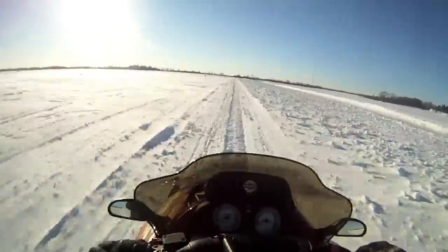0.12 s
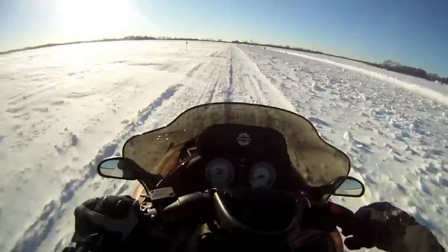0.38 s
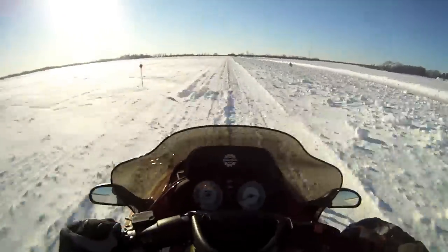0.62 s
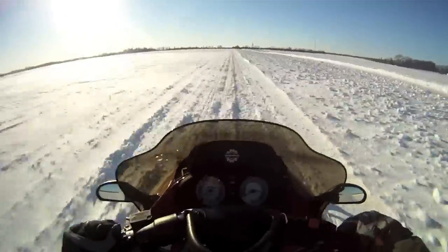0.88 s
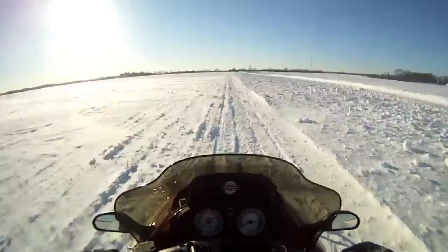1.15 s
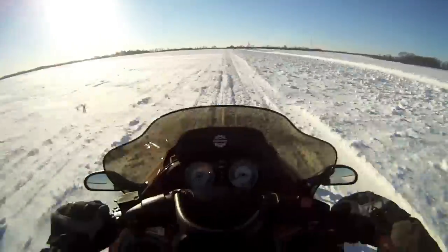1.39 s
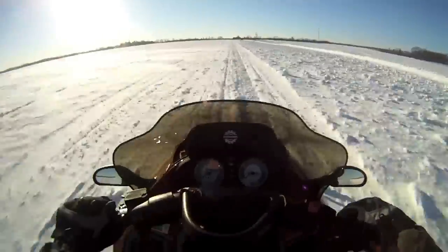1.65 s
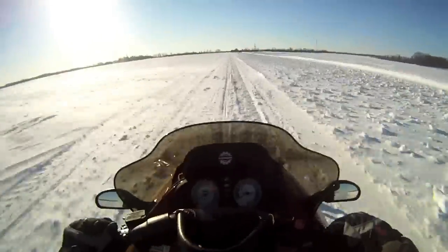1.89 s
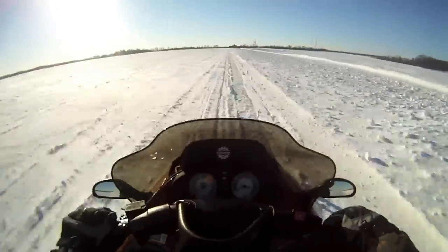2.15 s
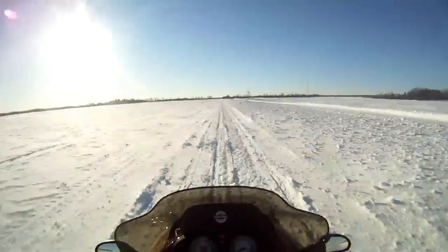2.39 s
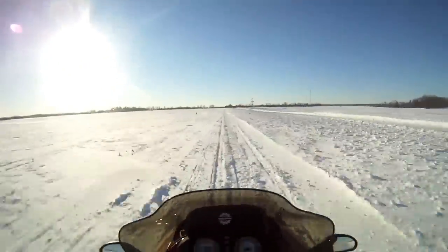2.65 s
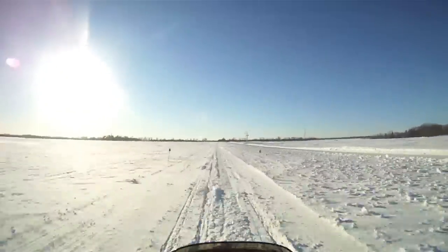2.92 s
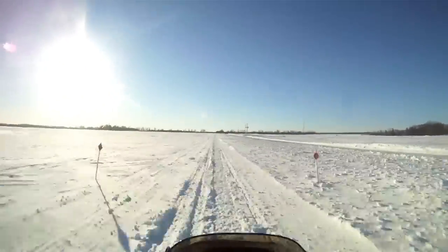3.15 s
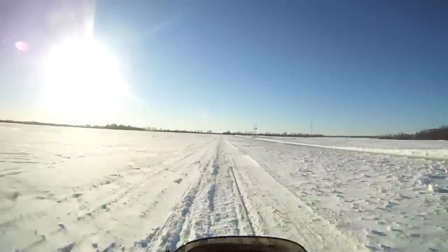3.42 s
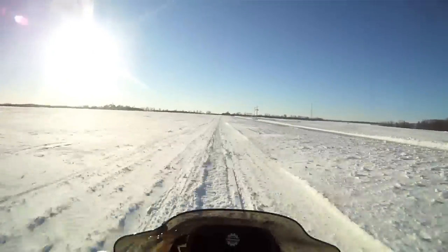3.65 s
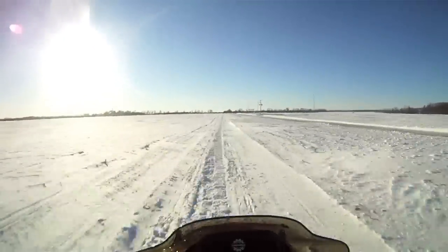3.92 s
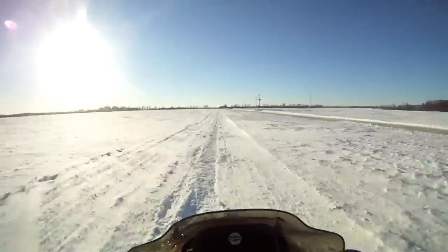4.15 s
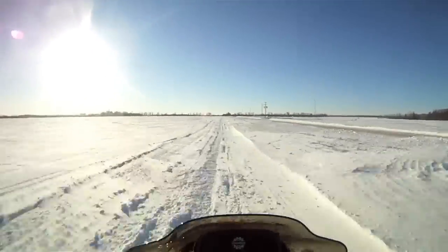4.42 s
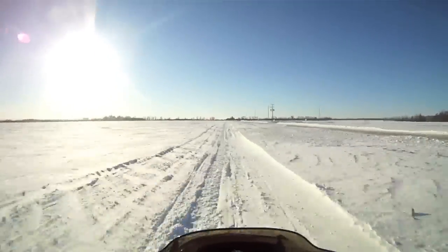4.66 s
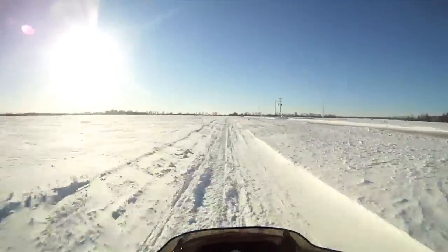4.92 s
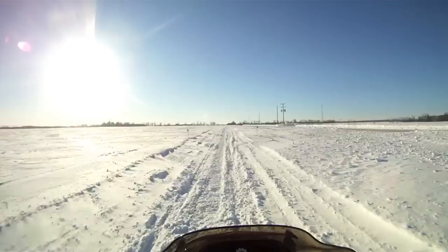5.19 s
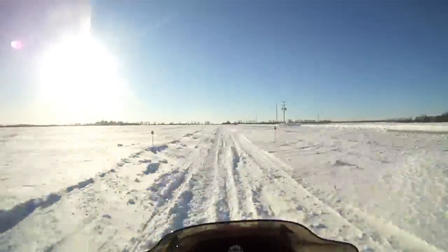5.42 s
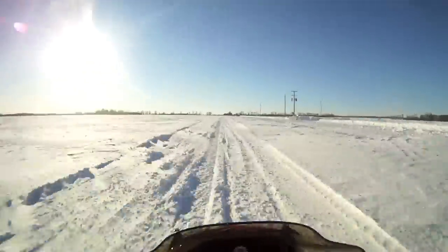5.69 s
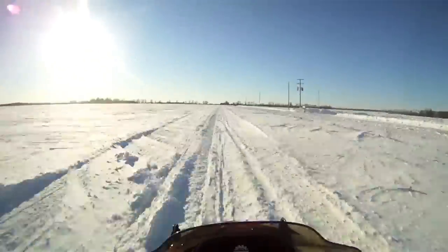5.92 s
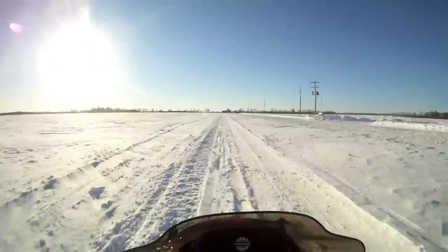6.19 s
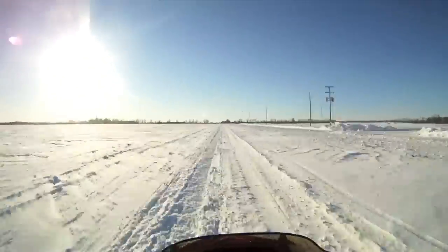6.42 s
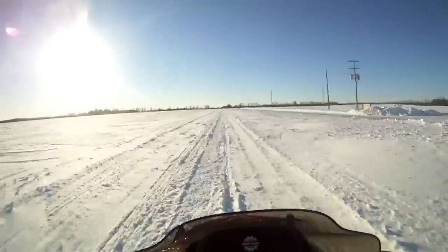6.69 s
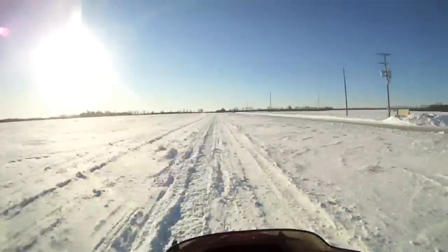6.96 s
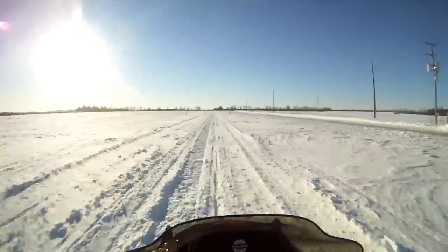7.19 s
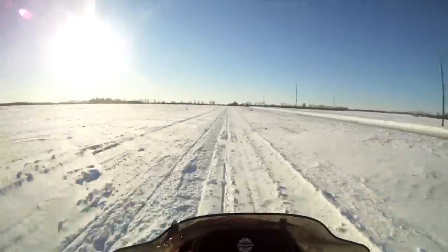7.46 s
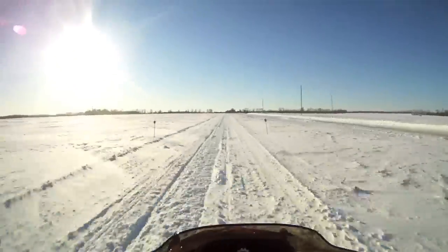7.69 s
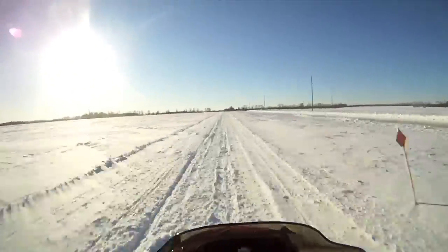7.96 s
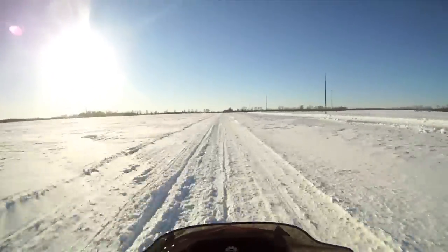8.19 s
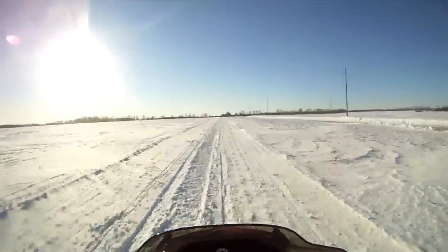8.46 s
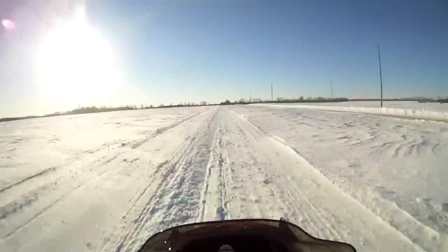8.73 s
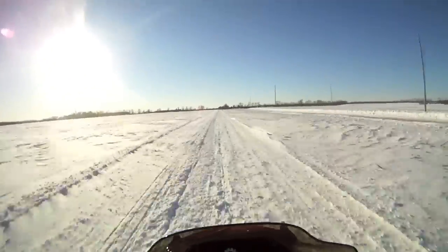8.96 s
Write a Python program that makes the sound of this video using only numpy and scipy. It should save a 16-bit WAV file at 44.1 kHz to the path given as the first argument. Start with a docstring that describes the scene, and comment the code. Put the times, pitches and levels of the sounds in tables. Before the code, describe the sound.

Headwind fills a sealed housing on a snowmobile rider's helmet over an open snowfield; no separate engine is audible. From 0 s a muffled hiss rises quickly, hollow and nasal around one to four kilohertz, over low buffeting near 100 to 150 hertz and faint thin shell ringing. A small high knock comes at 0.2 s, a stronger one at 1.3 s. Deep open wind is fullest from about 0.4 to 2.2 s, with scattered hard thumps. A brief lull near 2.5 s leads into a bright rush of hiss peaking at 2.8 s. From 3 s the deep wind recedes and tight gusts batter irregularly, several each second, especially strong near 5.7, 6.0, 6.4 and 7.7 s. The hiss eases around 7.2 s, then swells again near 8.2 s. Hard gusts momentarily duck everything, with gritty mirrored treble above. The roar continues to the end at 9.1 s.

```python
"""A snowy field, crossed flat out by snowmobile, heard from inside a sealed housing on the rider's helmet.
Only the headwind is heard: shaped noise makes the low buffeting, the hiss coloured by air cavities
and the thin shell tones; short decaying swings make the hard gusts and two knocks.
Gain control ducks the sound after the hardest gusts and lets it back slowly;
a slow sample-and-hold converter mirrors the sound into the treble."""
import sys
import numpy as np
from scipy import signal
from scipy.fft import rfft, irfft, next_fast_len
from scipy.io import wavfile
from scipy.ndimage import uniform_filter1d

SR = 44100
rng = np.random.default_rng(int(sys.argv[2]) if len(sys.argv) > 2 else 0)


def natural_amplitude(level_db):
    """Convert a level in decibels to a linear amplitude factor, elementwise."""
    exponent = np.asarray(level_db, float) / 20
    return 10 ** exponent


def unload_wav(signal):
    """Save mono or channel-first audio to the path in sys.argv[1] as 16-bit WAV at rate SR, clipped to [-1, 1]."""
    wavfile.write(
        sys.argv[1],
        SR,
        np.round(np.clip(np.atleast_2d(signal).T, -1, 1) * 32767).astype(np.int16),
    )


N = 400868


def evened(x):
    """Normalisation: scales to an rms of 1."""
    return x / np.sqrt(np.mean(x ** 2) + 1e-20)


def curve(rows):
    """Linear interpolation in time: one value a sample for each column after the first."""
    s, *columns = np.transpose(rows)
    return [np.interp(np.arange(N) / SR, s, c) for c in columns]


def envelope(x):
    """Analytic signal: its magnitude is the momentary amplitude."""
    return abs(signal.hilbert(x, next_fast_len(N))[:N])


def spectrum(points, hz):
    """Spectral envelope: gain interpolated in decibels over log frequency."""
    f, db = np.transpose(points)
    return natural_amplitude(np.interp(np.log(hz + 1), np.log(f + 1), db, right=-120))


def resonances(modes, hz, steep):
    """Modal superposition: the powers of the resonance curves add; steep is the exponent of their skirts."""
    f, width, db = np.transpose(modes)[:, :, None]
    detuning = 2 * (hz - f) / width
    power = natural_amplitude(2 * db) / (1 + detuning ** 2) ** steep
    return np.sqrt(power.sum(0))


def wander(hz):
    """Low-passed noise: slow chance of rms 1, varying up to about hz."""
    lowpass = signal.butter(2, hz, fs=SR, output="sos")
    return evened(signal.sosfilt(lowpass, rng.standard_normal(N)))


def coloured(shape, patchy_db):
    """Short-time synthesis: shaped noise of rms 1 whose spectrum has drifting patches."""
    frames, hz = N // 1024 + 5, np.fft.rfftfreq(4096, 1 / SR)
    real, imaginary, patches = rng.standard_normal((frames, 2049, 3)).T
    patches = uniform_filter1d(patches, 40, 0)  # smooth over frequency
    patches = evened(uniform_filter1d(patches, 3, 1))  # smooth over time
    bins = (real + 1j * imaginary) * shape(hz)[:, None] * natural_amplitude(patchy_db * patches)
    noise = signal.istft(bins, nperseg=4096, noverlap=3072)[1]
    return evened(noise[2048:N + 2048])


# the head rises into the airstream, turns through it, then tucks down; levels before gain control:
# time_s, hiss_db, brightness_db (upper cavities), buffeting_db, open_wind_db (against the buffeting)
AIRFLOW = [(0, -23, -9.5, -17, -6), (.15, -16.5, -7, -19, -4), (.4, -17.5, -9, -13.5, 5.5),
           (1.2, -15.5, -7.5, -14.5, 0.5), (1.4, -15.5, -9, -13, 1.5), (2.2, -16, -8, -12.5, 3),
           (2.32, -13, -7.5, -17, -5), (2.8, -5.5, -6, -11, 1), (2.9, -10, -7.5, -7, -15),
           (3.4, -15, -6.5, -13, -27), (4.3, -13, -7.5, -13, -17), (5.2, -15, -6, -13, -13),
           (6.2, -12.5, -7.5, -10.5, -16), (7.2, -19, -7, -16, -16), (7.45, -13, -7, -15.5, -8),
           (8.2, -11, -6.5, -10, -18), (9.09, -13, -6.5, -13, -9)]
# air cavities in front of the microphone, relative levels: pitch_hz, nominal_width_hz, level_db
LOWER_CAVITIES = [(852, 92, -10.5), (1272, 273, -5), (1666, 470, -5), (1980, 165, -7), (2202, 510, -3),
                  (2860, 380, -21)]
UPPER_CAVITIES = [(3372, 320, -7), (3760, 495, -2.5), (4760, 350, -15), (5360, 1370, -20)]


def hiss():
    """Cavity resonance: turbulence at the port, fluttering as eddies pass, rings the cavities."""
    level_db, bright_db = curve(AIRFLOW)[:2]
    lower = coloured(lambda hz: resonances(LOWER_CAVITIES, hz, steep=1.62), patchy_db=0.22)
    upper = coloured(lambda hz: resonances(UPPER_CAVITIES, hz, steep=2.05), patchy_db=0.03)
    flutter_db = 1.05 * wander(hz=141) + 0.52 * wander(hz=23.1)
    upper_flutter_db = 0.8 * flutter_db + 0.3 * wander(hz=200) + 0.49 * wander(hz=12)
    lower = lower * natural_amplitude(flutter_db)
    upper = upper * natural_amplitude(bright_db + upper_flutter_db)
    return natural_amplitude(level_db) * (lower + upper)


# thin shell ringing in the wind, relative levels: pitch_hz, nominal_width_hz, level_db
SHELL = [(395, 8, -2), (418, 8, 0), (529, 8, -1), (626, 14, 0), (750, 28, 4), (1990, 20, 9)]


def shell():
    """Structural modes: noise rings the narrow modes of the housing, shaken harder by open wind."""
    modes = resonances(SHELL, np.fft.rfftfreq(N, 1 / SR), steep=1.8)
    ringing = evened(irfft(rfft(rng.standard_normal(N)) * modes, N))
    level_db, _, _, open_db = curve(AIRFLOW)
    return ringing * natural_amplitude(level_db - 13 + 0.16 * open_db)  # 13 dB is taken off the hiss level


# spectral densities of the push on the housing and of the raw wind, relative: pitch_hz, level_db
RUMBLE = [(30, -24), (59, -55), (85, -5.5), (105, 0.5), (128, 0.5), (169, -4), (205, -11), (260, -18.5),
          (370, -31.5), (560, -49), (900, -44)]
DEEP_WIND = [(15, -12), (30, -16), (58, -7.5), (92, 0), (150, -8.5), (240, -15.5), (400, -24.5),
             (700, -26.5), (1000, -26), (1400, -48)]
# brief changes of the push, nearly all lulls: centre_s, half_length_s (to 1/e of the change), change_db
LULLS = [(.05, .03, -10), (0.903, 0.019, -3), (1.04, .02, -8), (2.472, 0.028, -12), (3.065, 0.017, -14),
         (3.56, .015, -12), (4.126, 0.014, -10), (4.29, 0.012, -6), (4.938, 0.015, -12), (5.315, 0.035, -5),
         (5.557, .04, -13), (5.825, 0.15, -5.5), (6.116, .04, -5), (6.76, .03, -4), (7.344, 0.024, -6),
         (7.52, 0.02, -10), (7.626, 0.012, -10), (7.776, 0.029, 1), (7.99, 0.0075, -5), (8.403, 0.026, -12),
         (8.666, 0.044, -5.5)]


def buffet():
    """Turbulent pressure: large eddies push; raw, deeper wind fades once the rider tucks behind the windshield."""
    push = coloured(lambda hz: spectrum(RUMBLE, hz), patchy_db=0.3)
    swing = uniform_filter1d(envelope(push), 300)
    push = evened(push / (swing + .2) ** .55)  # between hard gusts the push is even
    raw = coloured(lambda hz: spectrum(DEEP_WIND, hz), patchy_db=0.5)
    level_db, open_db = curve(AIRFLOW)[2:]
    t = np.arange(N) / SR
    lull_db = sum(db * np.exp(-((t - s) / half) ** 2) for s, half, db in LULLS)
    share = natural_amplitude(open_db)
    mix = natural_amplitude(lull_db) * push + share * raw
    return natural_amplitude(level_db) * mix / np.hypot(1, share)  # the sharing leaves the power as it was


def bumps(rows, turns, ring, ring_db):
    """Damped oscillation: a swing of a few cycles around its moment, then a softer ring; spans in cycles."""
    out = np.zeros(N + SR)
    for (s, db, hz), phase in zip(rows, rng.random((len(rows), 1))):
        cycles = np.arange(-3 * turns, 3 * turns + 4 * ring, hz / SR)
        at = round((s - 3 * turns / hz) * SR)
        swing = np.exp(-(cycles / turns) ** 2)
        tail = (cycles > 0) * natural_amplitude(ring_db) * np.exp(-cycles / ring)
        tone = np.cos(2 * np.pi * (cycles + phase))
        out[at:at + len(cycles)] += natural_amplitude(db) * np.maximum(swing, tail) * tone
    return out[:N]


# knocks on the shell, envelope peak before gain control: centre_s, level_db, pitch_hz
KNOCKS = [(0.205, -4.5, 2100), (1.331, 1, 1604)]


def knocks():
    """Impact response: each blow sets off a short, high oscillation."""
    return bumps(KNOCKS, turns=3.5, ring=2.2, ring_db=-6)


# hard gusts, envelope peak before gain control: centre_s, level_db, pitch_hz
GUSTS = [(0.35, -2.5, 126), (0.501, -5.0, 125), (0.658, -1.8, 125), (0.778, -4.5, 138), (0.851, -1, 133.0),
         (0.952, -1.3, 124), (1.076, -4, 130), (1.139, -4.5, 123.0), (1.54, -5, 121.0), (1.793, -0.5, 123),
         (1.926, -4.5, 148), (1.981, 0, 128), (2.097, -0.5, 130), (3.026, 0, 137), (3.098, 0.8, 126),
         (3.197, 0.5, 125), (3.359, -3, 135), (3.533, -0.5, 136.0), (3.59, -0.2, 135.0), (3.753, -2, 136.0),
         (3.818, -3.5, 126.0), (3.878, -2.5, 149), (3.917, -1, 133), (4.018, -1, 143.0), (4.104, -1.1, 125),
         (4.259, -2.5, 152), (4.369, -0.7, 130), (4.507, -4.5, 142.0), (4.609, -3.5, 124), (4.666, -3, 138),
         (4.717, -4.5, 154), (4.871, -1.5, 131), (5.021, -1, 128.0), (5.138, -1.7, 141.0), (5.237, 0, 127),
         (5.394, -5, 135.0), (5.448, -1, 131), (5.683, 2.8, 134), (5.729, 2.5, 130.0), (5.996, 2.5, 128),
         (6.397, 2, 138), (6.529, -2.9, 127), (6.666, -2.5, 136.0), (6.705, 0, 123), (6.945, -3.5, 131),
         (7.114, -5, 142), (7.16, -3.5, 138), (7.205, -2.5, 137), (7.469, -2.5, 126), (7.599, -4, 138.0),
         (7.677, 3.5, 125), (7.883, -2.5, 160), (7.971, 1, 120), (8.063, 1.5, 132.0), (8.198, -6, 135),
         (8.236, -0.5, 122), (8.293, 0, 135), (8.522, 1.5, 144), (8.584, 1.5, 124.0), (8.811, -1.5, 126),
         (9.051, -0.6, 137)]


def hard_gusts():
    """Pressure transient: each gust is a low swing of about a cycle with a brief ring."""
    return bumps(GUSTS, turns=0.79, ring=2.2, ring_db=-5)


def scene():
    """Superposition, with masking built in: a hard gust takes the place of the buffeting while it lasts."""
    gusts = hard_gusts()
    swept = np.exp(-envelope(gusts) / 0.77)
    return (hiss() + shell() + swept * buffet() + knocks() + gusts)[None]


HOLD_HZ = 12000  # rate of the slow converter
SENSE_S, SMOOTH_S = 0.0038, 0.0052  # span of the power average, time constant of the gain
KNEE_DB, DUCK_SHARE = -11.5, 0.91  # onset, and share of the excess level taken away
HELD_FALL_DB_PER_S = 33.5  # how fast the held level sinks after a peak


def gain_control(slow):
    """Dynamic range compression: gain falls fast above the knee and recovers slowly."""
    power = abs(uniform_filter1d(slow ** 2, round(SENSE_S * HOLD_HZ)))
    power_db = 10 * np.log10(power + 1e-9)
    fall_db = np.arange(len(slow)) * HELD_FALL_DB_PER_S / HOLD_HZ
    held_db = np.maximum.accumulate(power_db + fall_db) - fall_db
    over_db = np.maximum(held_db - KNEE_DB, 0)
    keep = np.exp(-1 / (SMOOTH_S * HOLD_HZ))
    return slow / natural_amplitude(DUCK_SHARE * signal.lfilter([1 - keep], [1, -keep], over_db))


def sample_and_hold(slow):
    """Spectral imaging: holding each sample until the next mirrors the sound above half the slow rate."""
    held = signal.resample_poly(np.repeat(slow, 4), 147, 160)  # 48000 Hz to SR
    held = np.pad(held, (0, 8))[:N]
    edge = signal.firwin(1023, 15270, window=("kaiser", 10), fs=SR)  # low-pass, Hz
    return signal.oaconvolve(held, edge, "same")


def band_limit(x):
    """A steep low-pass at the top of the band."""
    return signal.sosfilt(signal.butter(12, 15920, fs=SR, output="sos"), x)


def record(dry):
    """Signal chain: slow sampling, gain control, soft saturation, then sample and hold."""
    slow = signal.resample_poly(dry[0], 40, 147)  # SR to HOLD_HZ
    ducked = gain_control(slow)
    ducked = ducked / (1 + abs(ducked / .92) ** 6) ** (1 / 6)  # the amplifier rounds off its highest peaks
    mix = sample_and_hold(ducked)[None]
    return band_limit(mix)


dry = scene()
out = record(dry)
unload_wav(out)
```